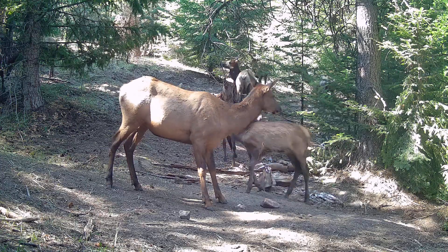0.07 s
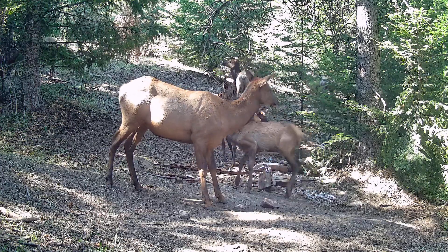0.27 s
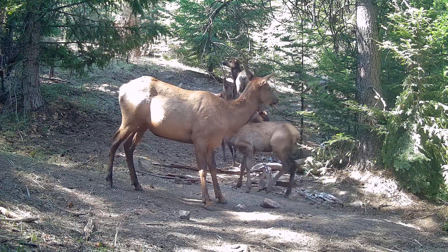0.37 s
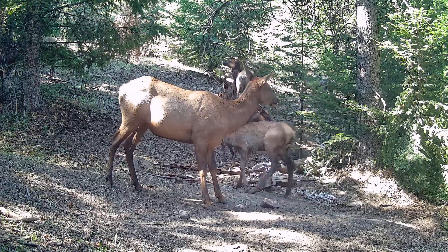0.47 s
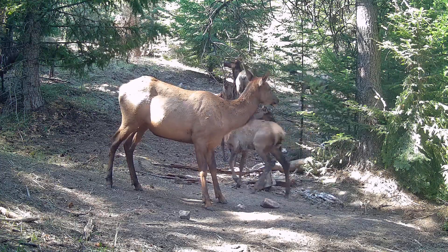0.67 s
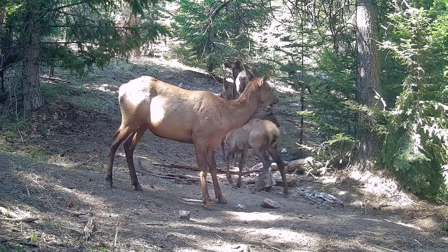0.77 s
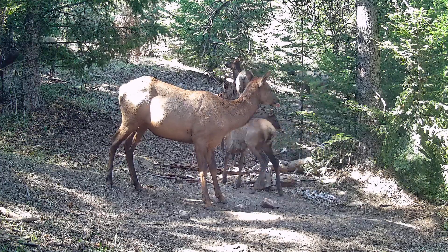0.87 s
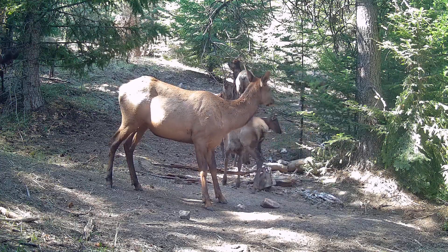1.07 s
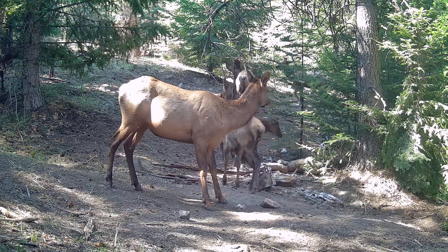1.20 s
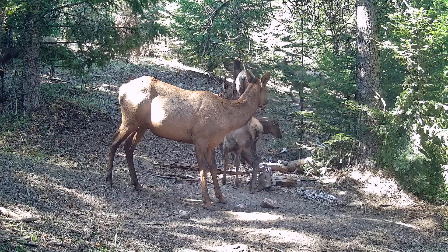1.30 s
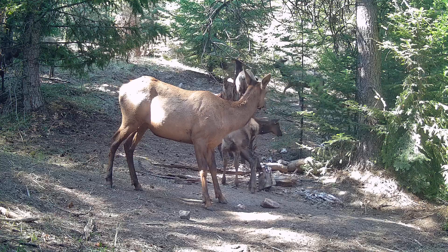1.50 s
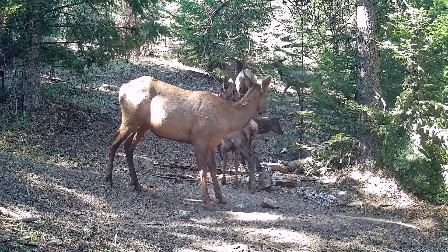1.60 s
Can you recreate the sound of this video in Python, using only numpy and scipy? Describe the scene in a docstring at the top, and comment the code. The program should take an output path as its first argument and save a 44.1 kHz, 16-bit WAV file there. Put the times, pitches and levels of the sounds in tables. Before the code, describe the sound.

Twigs snap twice under elk hooves in a quiet forest, after a faint squeak.

```python
"""Elk move about a quiet forest clearing, their hooves ticking and scuffing in the dry litter.
A thin, broken squeak, probably a calf's, is a harmonic tone shaped by throat resonances.
Two twigs then snap under hoof, and a third faintly: breaking fibres excite the wood's modes.
Trunks scatter a short echo. Puffs of air buffet the microphone over a faint hiss and low rumble."""
import sys
import numpy as np
from scipy import signal
from scipy.fft import rfft, irfft
from scipy.io import wavfile
from scipy.ndimage import uniform_filter1d

SR = 44100
rng = np.random.default_rng(int(sys.argv[2]) if len(sys.argv) > 2 else 0)


def generate_wav(sig):
    """Save sig (samples, or channels by samples) to the path in sys.argv[1] as 16-bit PCM at SR."""
    pcm = np.round(np.clip(np.atleast_2d(sig).T, -1, 1) * 32767).astype(np.int16)
    wavfile.write(sys.argv[1], SR, pcm)


N = 72765
TIME = np.arange(N) / SR

# Modes of two twigs. Each row: frequency in Hz, relative level in dB, time to fall 60 dB in seconds.
THICK_TWIG = [(1376, -9, 0.051), (1450, 0.5, 0.018), (2210, -0.5, 0.023), (2320, -4, 0.021),
              (2950, -2.5, 0.012), (2970, -5.5, .01), (5760, -5, 0.011), (8030, -0.5, 0.0061)]
THIN_TWIG = [(2450, 1, .04), (3146, 3, 0.027), (3426, -1, 0.036), (3700, -9, 0.021), (4660, -10, 0.018),
             (5850, -7, 0.016)]


def amp(db):
    """Amplitude ratio of a level in decibels."""
    return 10 ** (np.asarray(db) / 20)


def unit(x):
    """Normalisation to an rms of 1."""
    return x / np.sqrt(np.mean(x ** 2) + 1e-20)


def level_at(spectrum, hz):
    """Interpolation of a spectrum's level in dB along a log-frequency axis."""
    f, db = np.transpose(spectrum)
    return np.interp(np.log(hz + 1), np.log(np.sort(f)), db)


def noise(gain):
    """Spectral shaping: white noise weighted by gain(hz), at an rms of 1."""
    white = rfft(rng.standard_normal(N))
    return unit(irfft(white * gain(np.fft.rfftfreq(N, 1 / SR) + 1e-3), N))


def add(mix, start, sound):
    """Superposition of a sound on the mix, from a start in seconds."""
    part = mix[max(round(start * SR), 0):][:len(sound)]
    part += sound[:len(part)]


def background():
    """Broadband noise: a hiss, faintly modulated in time and frequency, over a rumble of moving air."""
    # Each row: frequency in Hz, relative spectral density in dB.
    hiss_spectrum = [(88, -39.5), (150, -12), (174, 0.5), (317, -4.5), (345, -5.5), (387, -8), (514, -9),
                     (671, -9), (875, -13.5), (2110, -17.5), (6440, -20), (8000, -26.5), (10400, -34),
                     (17600, -120)]
    rumble_spectrum = [(12, -14.5), (28, 0), (60, -9.5), (110, -9.5), (170, -18), (300, -31)]
    # Each row: time in seconds, level in dB (for the hiss, relative to hiss_db).
    hiss_drift = [(0, 1.4), (.6, 0.44), (1.05, 0.13), (1.65, -0.27)]
    rumble_levels = [(0, -54), (.14, -57), (.45, -56.5), (.7, -59), (.8, -65), (1.15, -61.5), (1.35, -60),
                     (1.52, -61.5), (1.65, -59)]
    hiss_db, patch_db = -65.5, 1.4
    steady = noise(lambda f: amp(level_at(hiss_spectrum, f)) / (1 + (140 / f) ** 6))
    cells = signal.stft(steady, nperseg=512)[2]
    patches = uniform_filter1d(rng.standard_normal(cells.shape), size=7, axis=0)
    patches = unit(uniform_filter1d(patches, size=10, axis=1))
    hiss = unit(signal.istft(cells * amp(patch_db * patches), nperseg=512)[1][:N])
    rumble = noise(lambda f: amp(level_at(rumble_spectrum, f)) / (1 + (f / 400) ** 4))
    hiss *= amp(hiss_db + np.interp(TIME, *np.transpose(hiss_drift)))
    rumble *= amp(np.interp(TIME, *np.transpose(rumble_levels)))
    return hiss + rumble


def hoof_steps():
    """Impact and friction: hooves press or brush the litter, giving bursts of band-limited noise."""
    # Each row: start in seconds, level in dB, centre in Hz, width in octaves, rise and decay in seconds.
    contacts = [(.002, -48.5, 181, 0.14, 0.0027, 0.0095), (0.077, -63.5, 950, 0.45, 0.0048, 0.016),
                (0.072, -71.5, 4500, 1, 0.0072, 0.041), (0.111, -70, 5500, 0.14, 0.0088, 0.015),
                (.146, -59, 5550, 0.51, 0.0017, 0.0024), (.62, -72, 4500, .8, 0.012, 0.17),
                (0.649, -61, 215, .4, 0.0058, 0.05), (0.826, -68, 870, 0.56, .008, 0.02),
                (0.852, -58.5, 124.7, 0.13, 0.019, 0.016), (.935, -68.5, 805, 0.21, 0.0039, .025),
                (1.084, -62, 807, 0.19, 0.0026, 0.026), (1.479, -57.5, 240, 0.6, 0.0021, 0.033),
                (1.485, -65, 1190, 0.79, 0.0033, 0.02), (1.516, -60.5, 2390, 0.79, 0.00081, 0.0032)]
    out = np.zeros(N)
    for start, db, hz, octaves, rise, decay in contacts:
        t = np.maximum(TIME - start, 0)
        envelope = np.minimum(t / rise, 1) * np.exp(-np.maximum(t - rise, 0) / decay)
        out += amp(db) * envelope * noise(lambda f: np.exp(-.5 * (np.log2(f / hz) / octaves) ** 2))
    return out


def air_buffets():
    """Unsteady pressure: puffs rock the microphone in a low, lopsided oscillation, with eddies on top."""
    # Each row: centre in seconds, peak level in dB, frequency in Hz, half length in seconds.
    puffs = [(0.032, -42, 36.2, .02), (.218, -24, 52.6, .014), (0.25, -27, 69.1, 0.011),
             (0.3, -40.5, 41, 0.022), (0.378, -39.5, 48.6, 0.0093), (0.417, -29.5, 73.4, 0.0088),
             (0.475, -51.5, 56.57, 0.019), (0.569, -51.5, 42.36, 0.013), (0.714, -45, 42.7, 0.016),
             (.918, -41.5, 48.15, 0.016), (1.007, -50, 54.6, .012), (1.23, -46.5, 47.3, 0.013),
             (1.281, -48, 37, 0.026), (1.328, -41.5, 51.4, 0.014), (1.385, -34.5, 43.4, 0.0087),
             (1.418, -42.5, 64.8, 0.0065), (1.462, -45.5, 42.2, 0.011)]
    overtone_db, eddy_db, eddy_hz = -19.5, -26, 111
    centre, db, hz, half_length = np.transpose(puffs)[:, :, None]
    swells = amp(db) * np.exp(-((TIME - centre) / half_length) ** 2) + 1e-12
    envelope = swells.sum(0)
    pitch = (swells * hz).sum(0) / envelope
    phase = 2 * np.pi * (np.cumsum(pitch) / SR + rng.random())
    eddies = noise(lambda f: (f / eddy_hz) ** 2 / (1 + (f / eddy_hz) ** 6))
    return envelope * (np.sin(phase) + amp(overtone_db) * np.sin(2 * phase) + amp(eddy_db) * eddies)


def calf_squeak():
    """Source and filter: throat resonances colour an unsteady harmonic tone and a little rasp."""
    # One list a note. Each point: time in seconds, pitch in Hz, level in dB before trim_db.
    notes = [
        [(.208, 650, -65), (.218, 660, -62.5), (.225, 626, -55), (.232, 657, -71), (.245, 670, -72)],
        [(.259, 535, -67), (.268, 533, -55.5), (.273, 574, -56), (.28, 560, -75)],
        [(.274, 744, -58), (.282, 781, -54.5), (.29, 894, -54), (.297, 868, -55.5), (.303, 875, -53.5),
         (.309, 750, -66.5), (.322, 690, -60.5)],
    ]
    # Each entry: one note's added slope above 1900 Hz in dB per octave.
    tilts = [-12.5, 0, 0]
    # Each row: frequency in Hz, gain of the throat in dB.
    throat = [(550, -36), (650, -39.5), (760, -21), (880, 4.5), (1200, -32.5), (1700, -5), (1950, 5),
              (2250, 0.5), (2650, 1), (3200, -17), (3850, -10), (5000, -33)]
    jitter, rasp_db, trim_db, fade_s = .01, -16, -1.5, 0.0056
    orders = np.arange(1, 8)[:, None]
    out = np.zeros(N)
    for note, tilt in zip(notes, tilts):
        times, pitch, db = np.transpose(note)
        waver = noise(lambda f: 1 / (1 + (f / 250) ** 4))
        hz = np.interp(TIME, times, pitch) * (1 + jitter * waver)
        phase = 2 * np.pi * np.cumsum(hz) / SR
        gains = amp(level_at(throat, orders * hz) + tilt * np.log2(np.maximum(orders * hz / 1900, 1)))
        tone = (gains * np.sin(orders * phase)).sum(0) / np.sqrt((gains ** 2).sum(0) / 2)
        rasp = amp(rasp_db) * noise(lambda f: amp(level_at(throat, f)))
        gate = np.clip(np.minimum(TIME - times[0], times[-1] - TIME) / fade_s, 0, 1)
        out += amp(trim_db + np.interp(TIME, times, db)) * gate * (tone + rasp)
    return out


def twig_snaps():
    """Brittle fracture: each fibre cracks and excites the modes of a twig too thin to radiate bass."""
    # Each row: start in seconds, level in dB, modes, relative crack level in dB,
    # crack decay and ring rise in seconds, radiation cutoff in Hz.
    snaps = [(0.3815, -42.5, THICK_TWIG, -1.5, 0.0012, 0.00024, 1280),
             (.6140, -50.5, THIN_TWIG, -6, 0.0024, 0.00069, 2130),
             (1.4752, -61, THICK_TWIG, 1, .0018, 0.00017, 1160)]
    # Each row: delay of a fibre's break in seconds, relative level in dB.
    fibres = [(0, 1), (.0009, -24), (.0078, -24.5)]
    t = TIME[:SR // 8]
    out = np.zeros(N)
    for start, db, modes, crack_db, crack_decay, rise, cutoff_hz in snaps:
        ring = sum(amp(level - 60 * t / t60) * np.sin(2 * np.pi * hz * t) for hz, level, t60 in modes)
        ring *= np.minimum(t / rise, 1)
        snap = np.zeros(len(t))
        for delay, fibre_db in fibres:
            crack = np.diff(rng.standard_normal(len(t)) * np.exp(-t / crack_decay), prepend=0)
            add(snap, delay, amp(db + fibre_db) * (ring + amp(crack_db) * crack))
        radiation = signal.butter(N=5, Wn=cutoff_hz, btype="high", fs=SR, output="sos")
        add(out, start, signal.sosfilt(radiation, snap))
    return out


def trunk_echoes(sound):
    """Scattering: sparse reflections from the trunks form a weak, short reverberant tail."""
    tail_db, t60_s, echoes_per_s = -16, 0.23, 2000
    t = TIME[:SR // 2]
    echoes = rng.standard_normal(len(t)) * (rng.random(len(t)) < echoes_per_s / SR)
    tail = echoes * amp(-60 * t / t60_s) * (t > .004)
    return amp(tail_db) * signal.fftconvolve(sound, tail / np.linalg.norm(tail))[:N]


def scene():
    """Superposition of the elk, their echoes, the buffets and the background in one channel."""
    elk = calf_squeak() + hoof_steps() + twig_snaps()
    return (elk + trunk_echoes(elk) + air_buffets() + background())[None]


def record(dry):
    """Band limiting: a low-pass filter removes the highest treble."""
    lowpass = signal.firwin(121, cutoff=8250, window=("kaiser", 5), fs=SR)
    return signal.oaconvolve(dry, lowpass[None], "same")


dry = scene()
out = record(dry)
generate_wav(out)
```